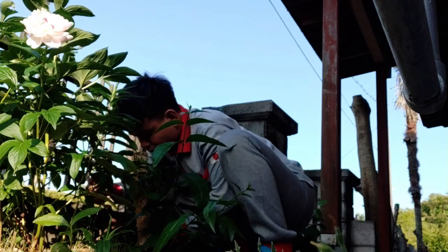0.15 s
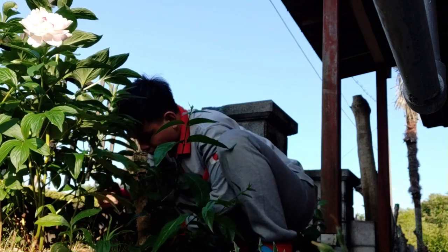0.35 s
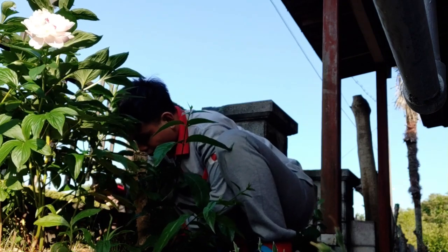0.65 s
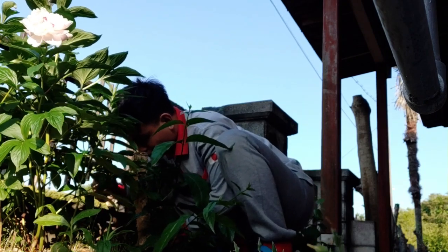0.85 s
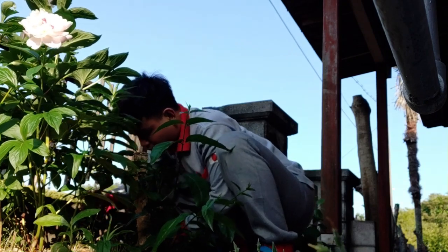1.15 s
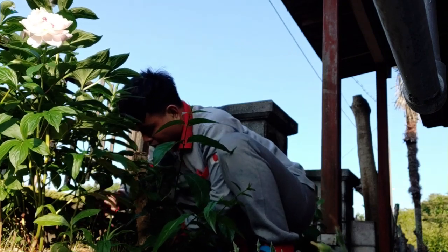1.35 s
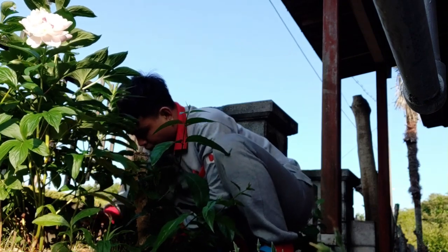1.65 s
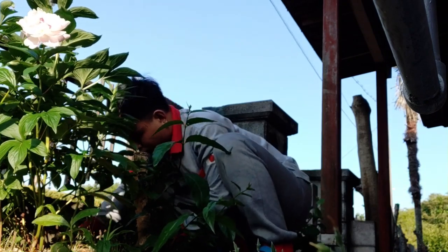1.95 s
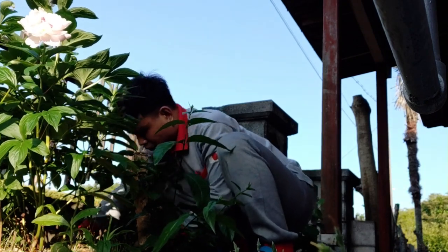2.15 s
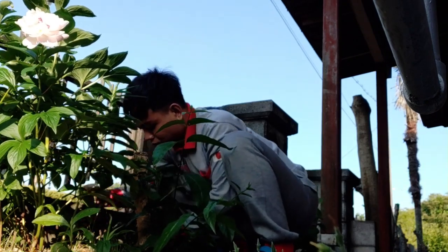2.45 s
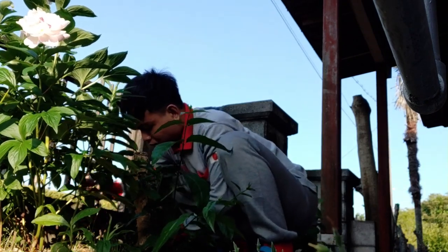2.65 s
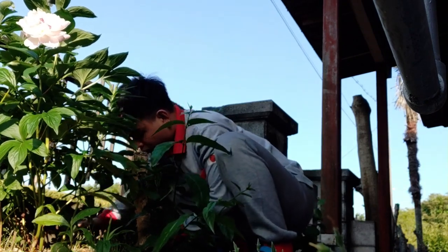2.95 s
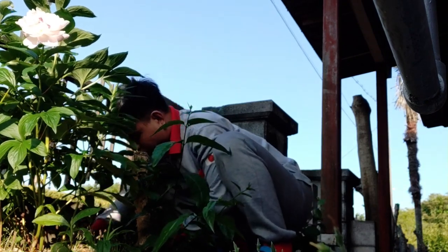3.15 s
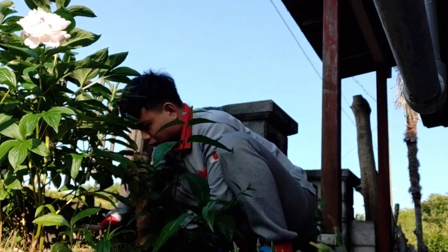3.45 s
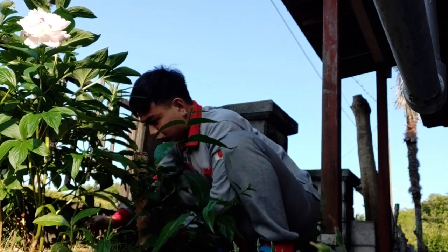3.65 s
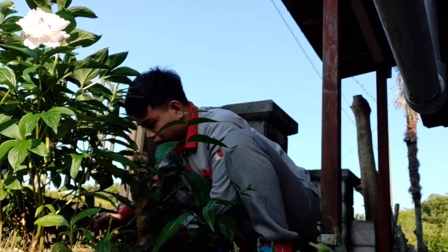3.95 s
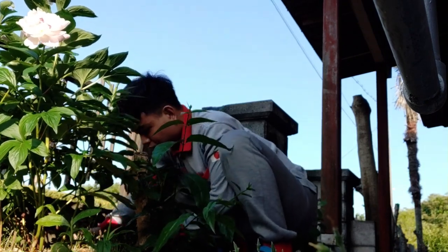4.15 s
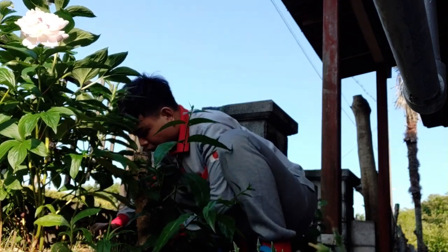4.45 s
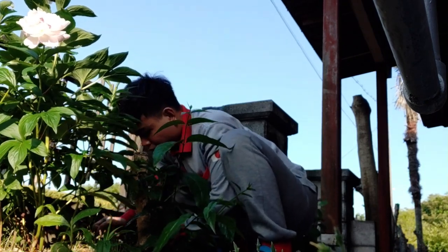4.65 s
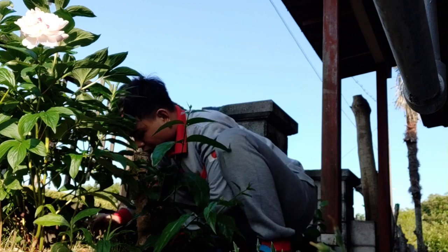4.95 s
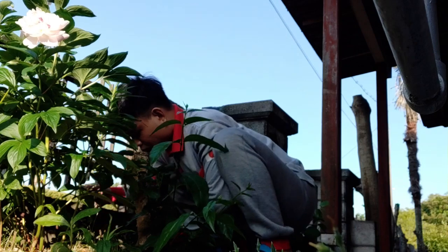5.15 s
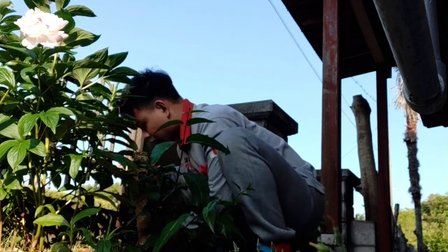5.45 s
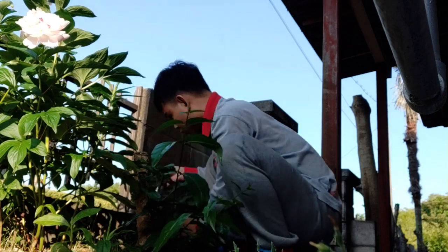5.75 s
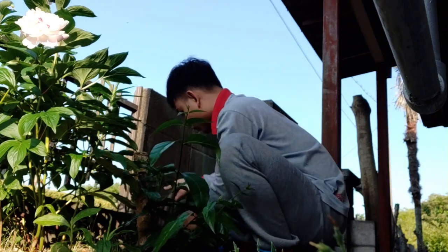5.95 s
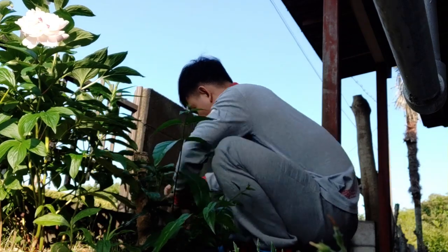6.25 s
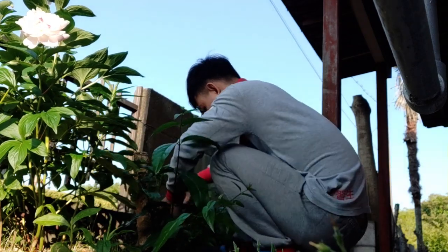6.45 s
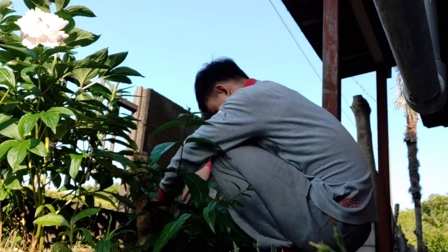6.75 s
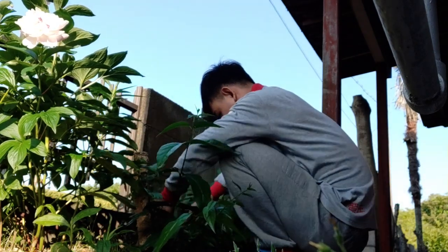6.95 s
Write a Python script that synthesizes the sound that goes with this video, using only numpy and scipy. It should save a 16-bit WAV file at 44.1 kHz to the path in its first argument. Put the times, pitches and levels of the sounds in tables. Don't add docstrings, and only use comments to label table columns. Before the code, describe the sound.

An open garden with a faint, smooth low rumble of distant traffic throughout. From 0 to about 2.3 s wind buffets the stereo microphone in soft low thumps, uneven left and right, strongest around 0.2 and 1.1 s. Over it, light leaf flicks lead to a crisp, bright tearing snap at 0.94 s, then fuller crackling and hollow stem ticks from 1.3 to 1.7 s. Rustling thins, with a soft brushing swell near 2.9 s. From 3 to 6 s there are only sparse, quiet leaf strokes and small clicks, around 3.6, 4.1, 4.5 to 4.7, 5.05 and 5.6 s. Rustling builds from 6.2 s into the loudest event at 6.38 to 6.45 s: a rapid cluster of hard woody cracks. Leaves crackle after, a faint low motor drone wavers in, and at 6.9 s a smaller split comes with a dull root-and-soil thud, ending in rustle at 7.1 s.

```python
import sys
import numpy as np
from scipy import signal
from scipy.fft import rfft, irfft, next_fast_len
from scipy.io import wavfile
from scipy.ndimage import uniform_filter1d

SR = 44100
rng = np.random.default_rng(int(sys.argv[2]) if len(sys.argv) > 2 else 0)


def int16_out(signal):
    q = np.round(np.clip(np.atleast_2d(signal).T, -1, 1) * 32767)
    wavfile.write(sys.argv[1], SR, q.astype(np.int16))


def volts(x):
    e = np.asarray(x, float) / 20
    return 10 ** e


N = 312644


def evened(x):
    return x / np.sqrt(np.mean(x ** 2) + 1e-20)


def read(points, hz, order=1):
    table = np.transpose(points)
    return np.interp(np.log(hz + 1), np.log(table[0] + 1), table[order])


def curves(rows):
    s, *columns = np.transpose(rows)
    return [np.interp(np.arange(N) / SR, s, c) for c in columns]


def add(mix, s, sound):
    part = mix[..., max(round(s * SR), 0):][..., :sound.shape[-1]]
    part += sound[..., :part.shape[-1]]


def shaped(x, gain):
    size = next_fast_len(N)
    return irfft(rfft(x, size) * gain(np.fft.rfftfreq(size, 1 / SR)), size)[..., :N]


def causal(points):
    log_gain = np.log(volts(read(points, abs(np.fft.fftfreq(2048, 1 / SR)))))
    return np.fft.ifft(np.exp(np.conj(signal.hilbert(log_gain)))).real[:1024]


def drift(span_s, channels):
    size = max(round(span_s * SR), 2)
    z = rng.standard_normal((channels, N))
    return evened(uniform_filter1d(uniform_filter1d(z, size), size))


def three_bands(x):
    body = shaped(x, lambda hz: 1 / (1 + (hz / 3900) ** 12))
    fizz = shaped(x, lambda hz: 1 - 1 / (1 + (hz / 10300) ** 12))
    return body, x - body - fizz, fizz


def at_ports(x, lag, likeness):
    # hz, gain_db
    port_left = [(400, -6), (1300, 1.5), (1900, 1), (2350, -1.5), (2900, 4), (3400, -6.5), (3900, -9.5),
                 (4700, -6), (6300, -3.5), (7100, -8), (8100, -16.5), (9000, -20), (10300, -22),
                 (12000, -21), (14000, -17), (15700, -17)]
    port_right = [(400, -6), (1300, 6), (1900, -0.5), (2350, -0.5), (2900, -3.5), (3400, -9.5),
                  (3900, -12.5), (4700, -8), (5900, -7), (7200, -4.5), (8100, 0), (8900, -5.5),
                  (10300, -10), (12000, -14.5), (14000, -14.5), (15700, -22)]
    same = np.clip(likeness, 0, 1)
    late = shaped(x[0], lambda hz: np.exp(-2j * np.pi * hz * lag / SR))
    right = same * late + np.sqrt(1 - same ** 2) * x[1]
    heard_left = signal.oaconvolve(x[0], causal(port_left))[:N]
    heard_right = signal.oaconvolve(right, causal(port_right))[:N]
    return np.array([heard_left, heard_right])


def far_rumble():
    # hz, level_db
    far_spectrum = [(15, -52), (30, -29), (55, -7), (85, 1), (180, -2), (275, -1), (400, -8), (650, -8),
                    (1000, -5), (1300, -6), (1650, -13), (1950, -25), (2300, -42), (3000, -62)]
    # hz, left_minus_right_db
    far_balance = [(60, 0), (130, 0), (290, -1.5), (640, -4.5), (1410, 4.5), (3100, -12), (6820, -4.5),
                   (15000, -7.5)]
    # hz, likeness, left_lead_rad
    far_pair = [(60, .8, 0), (270, .92, 0), (450, .75, .3), (780, .7, 2.6), (1290, .8, 3.6), (2200, .6, 6)]
    frames, hz = N // 256 + 5, np.fft.rfftfreq(1024, 1 / SR)
    a, b, c, d, patches = rng.standard_normal((frames, 513, 5)).T
    patches = evened(uniform_filter1d(uniform_filter1d(patches, 6, 0), 14, 1))
    same = np.clip(read(far_pair, hz), 0, 1)[:, None]
    lead = read(far_pair, hz, order=2)[:, None]
    left = a + 1j * b
    right = same * left + np.sqrt(1 - same ** 2) * (c + 1j * d)
    z = np.array([left * np.exp(1j * lead), right])
    balance_db = read(far_balance, hz) / 2 * np.array([[1], [-1]])
    z *= volts((read(far_spectrum, hz) + balance_db)[:, :, None] + 0.17 * patches)
    return volts(-52.5) * evened(signal.istft(z, nperseg=1024, noverlap=768)[1][:, :N])


def drone():
    # time_s, level_db
    motor_level = [
        (6.3, -92),
        (6.5, -71),
        (6.55, -57),
        (6.75, -58),
        (6.8, -75),
        (6.92, -65),
        (6.96, -53),
        (7.09, -67),
    ]
    waver = drift(0.0255, channels=2)
    pitch_hz = 264.3 + 14 * waver[0]
    turn = 2 * np.pi * np.cumsum(pitch_hz) / SR
    return np.sqrt(2) * volts(curves(motor_level)[0] + 1.0 * waver[1]) * np.sin(turn)


def pushes(rows):
    out, t = np.zeros(N), np.arange(-2000, 2000) / SR
    for s, db, hz, width_ms in rows:
        window = np.exp(-2.2 * (t * 1000 / width_ms) ** 2)
        crest = np.exp(-(t * hz * 3) ** 2) * np.cos(6 * np.pi * hz * t)
        lump = volts(db) * window * (np.cos(2 * np.pi * hz * t - .4) + volts(-16.5) * crest)
        unheard = max(round((-t[0] - s) * SR), 0)
        add(out, s + t[0], lump[unheard:])
    return out


def gust_strength():
    # middle_s, half_length_s, left_db, right_db
    gust_rows = [
        (0.0, 0.037, -37, -37),
        (0.136, 0.067, -39.5, -45),
        (0.53, 0.14, -46, -43),
        (1.093, 0.21, -44, -43),
        (1.483, 0.073, -65, -39.5),
        (1.8, .19, -45.5, -43),
        (2.258, 0.037, -50, -40.5),
        (2.752, 0.19, -56, -68),
        (4.506, 0.17, -72, -63),
    ]
    t, power = np.arange(N) / SR, volts(-89) ** 2
    for s, half, left_db, right_db in gust_rows:
        bell = np.exp(-((t - s) / half) ** 4)
        power = power + volts(np.array([[left_db], [right_db]])) ** 2 * bell
    return np.sqrt(power)


def wind():
    # hz, level_db
    wind_spectrum = [(15, -46), (40, 4.5), (90, 17), (160, 3.5), (260, -4.5), (500, -34)]
    # middle_s, peak_db, pitch_hz, width_ms
    eddies_left = [
        (0.04, -32, 128.6, 7.7),
        (0.269, -38.5, 110.2, 23),
        (0.676, -37, 102.7, 7.4),
        (0.701, -32, 132, 7.7),
        (0.916, -36, 122.0, 6.4),
        (0.988, -38.5, 112.0, 22),
        (1.663, -34.5, 136.0, 7.8),
        (1.767, -34, 145.0, 3),
        (1.812, -39, 117, 9.3),
    ]
    eddies_right = [(0.018, -35, 104, 7.7), (0.048, -38, 120, 5.9), (0.06, -26, 128, 6.2),
                    (0.105, -27, 131, 5.6), (0.121, -33, 190, 4), (0.129, -37, 200, 5),
                    (0.142, -31.5, 113, 12), (0.191, -29.5, 129, 8.1), (0.217, -22.5, 146, 6.4),
                    (0.265, -33, 137.2, 12), (0.286, -36, 126.5, 7.3), (0.447, -31.5, 122, 5.7),
                    (0.467, -32, 152.5, 8.6), (0.566, -31, 92.3, 7.3), (0.587, -32, 109.6, 8.5),
                    (0.711, -34, 123, 5.4), (0.766, -34.5, 111, 8.7), (0.823, -31, 108, 7.6),
                    (1.022, -38, 113.0, 6.7), (1.049, -35, 136.9, 7.1), (1.096, -28.5, 109, 8.8),
                    (1.144, -22.5, 155, 3.8), (1.452, -41, 131, 2.5), (1.495, -35, 127, 8.3),
                    (1.651, -32, 103.6, 8.2), (1.68, -32.5, 137.0, 2.1), (1.772, -30.5, 139, 6)]
    flow = evened(shaped(rng.standard_normal((2, N)), lambda hz: volts(read(wind_spectrum, hz))))
    lumps_db = 6.0 * drift(0.024, channels=2)
    return gust_strength() * volts(lumps_db - 9.0) * flow + [pushes(eddies_left), pushes(eddies_right)]


def tearing():
    # middle_s, peak_db, pitch_hz, width_ms
    tugs = [
        (.948, -44.5, 413, 12.5),
        (4.638, -39, 312, 0.95),
        (6.414, -44.5, 355, 10.3),
        (6.899, -40.5, 291, 11),
        (6.905, -32, 213.6, 1.3),
        (6.918, -39, 160, 2.3),
        (6.924, -42, 124, 11.6),
    ]
    return pushes(tugs)


def snapping():
    # start_s, peak_db, pitch_hz, t60_ms
    snaps = [(0.9101, -50, 2844, 34), (0.9375, -39.5, 2830, 16), (0.9402, -29.5, 8220, 20),
             (0.9415, -29.5, 6730, 16), (4.101, -56, 3500, 25), (4.112, -56, 3270, 25),
             (4.124, -55, 3800, 20), (2.519, -53, 2950, 21), (5.062, -51, 6130, 48),
             (1.3556, -39, 1230, 14), (1.399, -38.5, 1310, 24), (1.4493, -42, 1300, 26),
             (1.494, -38.5, 1240, 19), (1.569, -52, 1350, 7.6), (2.467, -56, 2800, 66),
             (2.521, -51, 1384, 180), (3.5634, -48.5, 2730, 10), (4.5315, -42.5, 2760, 5.7),
             (4.678, -36.5, 1430, 7), (4.7296, -38.5, 1450, 8.4), (5.048, -49.5, 1315, 65),
             (5.6303, -41.5, 2020, 8.1), (6.069, -53.5, 6280, 75)]
    # start_s, peak_db, pitch_hz, t60_ms
    breaks = [(6.3816, -40, 1690, 7.1), (6.3816, -46, 3100, 6), (6.3943, -26, 1280, 11),
              (6.397, -25, 1730, 11), (6.403, -15, 1630, 3.4), (6.4067, -9, 1560, 7.9),
              (6.4097, -25, 1470, 14), (6.414, -32, 1360, 11), (6.42, -13, 1550, 6.7),
              (6.429, -19, 1080, 5.1), (6.4339, -11.5, 1620, 7.6), (6.4115, -25, 2290, 6),
              (6.4435, -37, 1500, 9), (6.451, -31, 1150, 11), (6.463, -46, 2500, 6), (6.4852, -43, 2900, 6),
              (6.8785, -36.5, 3000, 4.6), (6.8905, -36, 2000, 6), (6.9022, -37, 3000, 4.5),
              (6.399, -34, 1000, 8), (6.4085, -24, 2050, 6.9), (6.4345, -28, 2060, 4.7),
              (6.5394, -35, 2850, 4), (6.5165, -45, 2970, 6.7), (6.395, -37, 2830, 8.9),
              (6.421, -40, 2900, 5), (6.4334, -40, 2970, 5.6), (6.407, -32, 2900, 8.2),
              (6.816, -42.5, 1967, 10), (6.875, -24.5, 1870, 9.1), (6.875, -38.5, 4300, 4.7),
              (6.875, -34.5, 1053, 30), (6.8781, -21, 1980, 8.2), (6.9017, -21.5, 1901, 8.3),
              (6.9028, -44.5, 4260, 8.1)]
    # hz, left_minus_right_db
    ring_balance = [(1050, -2), (1350, 3.5), (1550, -10.5), (2000, -3), (2800, 17.5), (4300, 5.5),
                    (6300, -7.5), (8100, -13.5)]
    rise_cycles = 1.29
    out, ticks, t = np.zeros((2, N)), np.zeros((2, N)), np.arange(3000) / SR
    rows = snaps + breaks
    chance, grit = rng.random((len(rows), 2)), rng.standard_normal((len(rows), 2, 200))
    for (s, db, hz, t60_ms), (phase, skew), z in zip(rows, chance, grit):
        pan_db = read(ring_balance, hz)
        tick_db = -12 + 0.74 * max(db + 22.5, 0)
        rise = 1 - np.exp(-(t * hz / rise_cycles) ** 2)
        swing = rise * volts(db + 2 - 60000 * t / max(t60_ms, 4))
        turn = 2 * np.pi * (hz * t + phase)
        pair = np.array([np.sin(turn * 1.012 - .4 * skew), np.sin(turn)])
        add(out, s - .0004, volts(np.array([[pan_db / 2], [-pan_db / 2]])) * swing * pair)
        add(ticks, s, volts(db + tick_db - 60 * t[:200] / 0.005) * z)
    heard = at_ports(ticks, lag=3.8, likeness=0.68)
    body, leaf, fizz = three_bands(shaped(heard, lambda hz: 1 / (1 + (hz / 11500) ** 8)))
    out = out + volts(-8.0) * body + volts(-2.0) * leaf + volts(7.0) * fizz
    t = np.arange(4000) / SR
    scatter = rng.standard_normal((2, len(t))) * volts(-60 * t / .05) * (t > .003)
    scatter = scatter / np.linalg.norm(scatter[0])
    return out + volts(-13) * signal.fftconvolve(out, scatter, axes=1)[:, :N]


def cracks(per_s, spread_db, hiss):
    when = rng.random(N) < per_s / SR
    size = volts(spread_db * np.minimum(rng.exponential(1, N), 5)) * when
    puff = np.exp(-np.arange(120) / 69.0)
    z = rng.standard_normal((4, N))
    return evened(evened(np.convolve(size, puff)[:N] * z[:2]) + hiss * z[2:])


def crackling():
    # start_s, peak_db, stem_body_db (re peak)
    crackles = [(0.911, -40, -8), (0.9415, -31, -13), (1.306, -34.5, -7.5), (1.357, -34.5, -6),
                (1.4, -41, -0.5), (1.4305, -37, -6), (1.4494, -32.5, -1), (1.5706, -30.5, -3.5),
                (2.5774, -57, -2), (4.5323, -34.5, -3), (4.6354, -43, -7.5), (4.679, -43.5, -3),
                (4.729, -53, 3), (4.85, -51, -13.5), (5.631, -49.5, 5.5), (6.3944, -47, 7),
                (6.4131, -35.5, 11), (6.432, -29.5, 5.5), (6.485, -42, 1.5), (6.5161, -60, -11),
                (6.525, -43, -10), (6.5338, -33.5, -10), (6.54, -36.5, -4), (6.8806, -59, 19),
                (6.89, -51, 15)]
    # start_s, peak_db, stem_body_db (re peak)
    flicks = [(0.0248, -49, -26), (0.0706, -36, -20), (0.1171, -57, -6), (0.315, -50, -6),
              (0.375, -35, -24), (0.445, -46, -12), (0.5766, -47, -11), (0.6424, -49, -4), (0.821, -57, -1),
              (0.917, -34, -5), (0.9374, -23, -11), (0.9402, -22.5, -12), (0.9432, -28, -9),
              (0.9465, -31, -5), (0.9555, -35, -3), (0.962, -37, -2), (0.9715, -44, -6), (1.1533, -49, -8),
              (1.1744, -42, 2), (1.2544, -37, -11), (1.3244, -61, -6), (1.475, -41, 5), (1.589, -36, 3),
              (1.629, -36, 3), (1.641, -37, 2), (1.68, -50, -2), (1.978, -41, 3), (2.4683, -52, -6),
              (2.7511, -53, -17), (2.8265, -57, -6.5), (2.5205, -46, 0), (2.9094, -37, -5),
              (2.943, -45, -6), (2.985, -39, -4), (3.021, -42, 0), (3.1956, -56, 4), (3.5668, -55, -6),
              (3.8873, -49, -6), (4.103, -55, -4), (4.2494, -47, 3), (4.3575, -67, -3), (5.0217, -58, -2),
              (5.0449, -56, -1), (5.0624, -55, 0), (5.1454, -64, -7), (5.5019, -68.5, -14),
              (5.6935, -60, -6), (5.7794, -52, -6), (5.875, -51, 1), (6.065, -43, -14), (6.2567, -44, -8),
              (6.2913, -35, -8), (6.349, -37, 5), (6.3799, -45, -11), (6.4644, -35, -3), (6.7775, -45, -11),
              (6.8074, -53, -10), (6.8423, -64, -4), (6.8613, -53, 0), (6.9644, -59, -6), (6.9805, -60, -6),
              (7.016, -40, -4)]
    leaf_gain, body_gain, t = np.zeros(N), np.zeros(N), np.arange(9000) / SR
    fall = volts(-60 * t / 0.02) + volts(-15.5 - 60 * t / 0.15)
    rise = 1 - np.exp(-t / 0.00099)
    for s, db, body_db in crackles + [(s, db - 5.5, body_db) for s, db, body_db in flicks]:
        burst = volts(db - 6.5) * fall * rise
        add(leaf_gain, s - .001, burst)
        add(body_gain, s - .001, volts(body_db + 6.0) * burst)
    source = cracks(per_s=6000, spread_db=4.0, hiss=.6)
    _, leaf, fizz = three_bands(at_ports(leaf_gain * source, lag=11.0, likeness=0.18))
    body = three_bands(at_ports(body_gain * source, lag=8.7, likeness=0.4))[0]
    return volts(10.5) * (leaf + volts(1.5) * fizz) + volts(6.0) * body


def strokes(rows):
    t, power = np.arange(0, N + 64, 32) / SR, volts(-110) ** 2
    for s, hold, db, swell, fade in rows:
        before, after = np.maximum(s - t, 0), np.maximum(t - s - hold, 0)
        rise_db = db - 20 * (before / swell) ** 1.35
        settling = volts(-17.5 - 20 * after / .13) ** 2
        power = power + volts(rise_db) ** 2 * (volts(-20 * after / fade) ** 2 + settling)
    return np.interp(np.arange(N) / SR, t, 10 * np.log10(power))


def flecked(x, patchy_db):
    # hz, share
    fleck_share = [(3500, 1.0), (5500, .75), (10000, .7), (13000, .7)]
    z = signal.stft(x, nperseg=512, noverlap=384)[2]
    patches = rng.standard_normal(z.shape[:0:-1]).T
    patches = uniform_filter1d(patches, size=2, axis=0)
    patches = evened(uniform_filter1d(uniform_filter1d(patches, size=16), size=16))
    share = read(fleck_share, np.fft.rfftfreq(512, 1 / SR))[:, None]
    return signal.istft(z * volts(patchy_db * share * patches), nperseg=512, noverlap=384)[1][:, :N]


def brushing():
    # full_at_s, hold_s, leaf_level_db, swell_s (per 20 dB),
    # fade_s (per 20 dB)
    hand_strokes = [(.028, .005, -65, .06, .03), (.073, .004, -55.5, .025, .04), (.125, .012, -55, .05, .04),
                    (.32, .04, -65.5, .02, .06), (.374, .004, -56, .025, .03), (.455, .04, -49, .03, .02),
                    (.578, .015, -62.5, .08, .04), (.645, .005, -70.5, .04, .07),
                    (.823, .035, -64, .012, .06), (.912, .008, -61, .012, .012), (.94, .007, -38, .003, .03),
                    (.955, .018, -48, .01, .015), (1.165, .03, -57.5, .03, .12), (1.255, .01, -58, .08, .12),
                    (1.361, .004, -54.5, .03, .035), (1.453, .1, -57.5, .02, .05),
                    (1.58, .1, -55.5, .06, .4), (1.98, .16, -67.5, .2, .2), (2.405, .05, -69, .05, .1),
                    (2.47, .075, -60, .025, .12), (2.6, .04, -75, .05, .12), (2.726, .02, -69, .008, .1),
                    (2.753, .14, -62, .04, .1), (2.96, .055, -52, .17, .06), (3.063, .216, -66, .05, .14),
                    (3.45, .025, -61, .07, .07), (3.57, .005, -66, .05, .15), (3.73, .1, -72, .12, .1),
                    (3.88, .01, -71, .15, .07), (4.103, .035, -58.5, .012, .25), (4.4, .14, -68, .3, .06),
                    (4.727, .02, -67, .18, .17), (5.022, .02, -61, .012, .05), (5.05, .04, -54.5, .03, .15),
                    (5.16, .085, -67, .05, .1), (5.5, .02, -79, .03, .15), (5.62, .11, -69, .07, .25),
                    (5.79, .1, -68.5, .15, .1), (6.02, .03, -78, .02, .1), (6.068, .05, -62.5, .015, .4),
                    (6.38, .031, -54, .22, .2), (6.537, .005, -53.5, .07, .08), (6.6, .085, -62, .05, .17),
                    (6.789, .005, -66.5, .08, .08), (6.888, .05, -66, .06, .1), (7.01, .04, -57, .15, .1)]
    # time_s, stem_body_db (re leaf)
    grip = [(0.0, -6.5), (.25, -8), (.44, -9.5), (.48, -2), (.6, -10), (.94, -10), (1.05, 3), (1.2, -4),
            (2.55, -2), (2.68, -10), (2.78, -16), (2.9, -8), (3.0, 1), (3.3, -6), (3.5, -1), (3.75, -2.5),
            (4.0, -5.5), (4.12, -2), (4.9, -1), (5.1, -5.5), (5.3, -4.5), (5.55, -11), (5.64, -2.5),
            (5.8, 3), (6.07, -4), (6.3, 1), (6.47, 0.5), (6.55, -2.5), (6.65, 2.5), (6.9, 1.5),
            (7.09, -6.5)]
    # time_s, extra_fizz_db
    dryness = [(0, 1), (.5, 0.5), (1.5, 2.5), (2.1, 2.5), (2.27, -3), (2.45, 0.5), (2.75, 2), (3.3, 1),
               (3.75, 0.5), (4.2, 1.5), (4.9, 4), (5.1, -1), (5.45, 3.5), (5.85, -8), (6.05, 5.5),
               (6.3, -0.5), (6.7, 0), (6.87, -9), (7.0, 0.5)]
    leaf_db, body_db = strokes(hand_strokes), curves(grip)[0]
    source = flecked(cracks(per_s=900, spread_db=3.0, hiss=1.0), patchy_db=4.5)
    body, leaf, fizz = (evened(b) for b in three_bands(at_ports(source, lag=9.8, likeness=0.14)))
    dry_db = -10 + 0.1 * (leaf_db + 64.0) + curves(dryness)[0]
    flicker_db = 1.18 * drift(0.014, channels=1)
    mixed = volts(body_db + 3.5) * body + volts(-2.0) * leaf + volts(dry_db) * fizz
    return volts(leaf_db + flicker_db) * mixed


def scene():
    return brushing() + crackling() + snapping() + tearing() + wind() + far_rumble() + drone()


def thinned(x):
    # hz, level_db (per bin)
    drop_below = [(1700, -125), (2200, -101), (2800, -106), (3700, -97), (4400, -98.5), (5300, -106),
                  (7000, -113), (9500, -109), (11000, -103), (13000, -101), (15800, -100)]
    # hz, spread_db
    whim_spread = [(2000, 8.4), (9000, 8.4), (11000, 5.0), (15800, 4.0)]
    edge_hz = 15850
    hz, _, z = signal.stft(x, SR, nperseg=2048, noverlap=1024, window="cosine")
    power = abs(z) ** 2
    edges = np.arange(0, len(hz), 10)
    band = np.arange(len(hz)) // 10
    band_db = 10 * np.log10(np.add.reduceat(power, edges, axis=1) / 10 + 1e-20)
    treble = power[:, (hz > 2500) & (hz < 12000)].mean(1, keepdims=True)
    treble_db = 10 * np.log10(treble + 1e-20)
    whim = uniform_filter1d(rng.standard_normal(band_db.shape[:0:-1]), size=3, axis=0).T
    masking_db = .6 * np.maximum(treble_db + 97, 0)
    limit_db = read(drop_below, hz[edges])[:, None] + masking_db
    limit_db = np.minimum(limit_db, 1.22 * (treble_db + 96) - 96.5)
    limit_db = limit_db + read(whim_spread, hz[edges])[:, None] * evened(whim)
    kept = 1 / (1 + np.exp(np.clip((limit_db - band_db) / .3, -30, 30)))
    keep = np.maximum(kept[:, band], volts(-32)) * (hz < edge_hz)[:, None]
    return signal.istft(z * keep, SR, nperseg=2048, noverlap=1024, window="cosine")[1][:, :N]


def low_pass(x):
    return signal.sosfilt(signal.butter(12, 16460, fs=SR, output="sos"), x)


def record(dry):
    hiss = volts(-92) * rng.standard_normal(dry.shape)
    return low_pass(thinned(dry + hiss))


dry = scene()
out = record(dry)
int16_out(out)
```